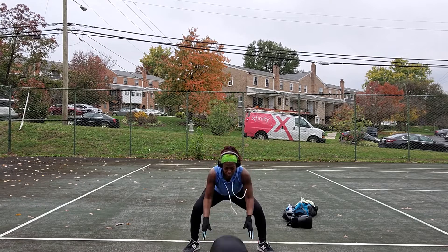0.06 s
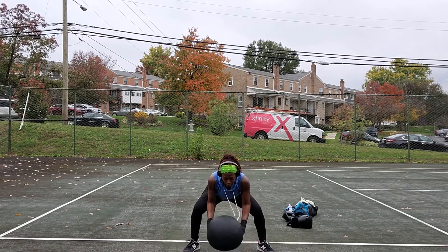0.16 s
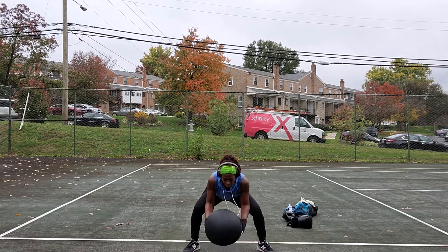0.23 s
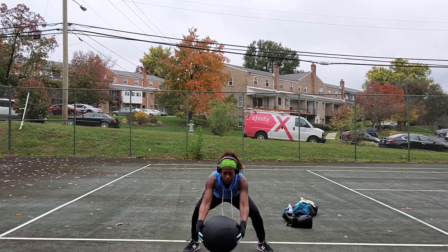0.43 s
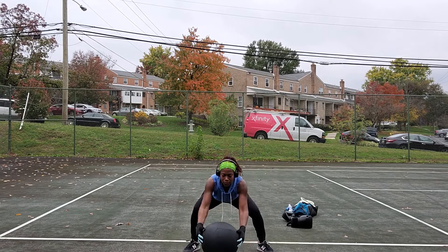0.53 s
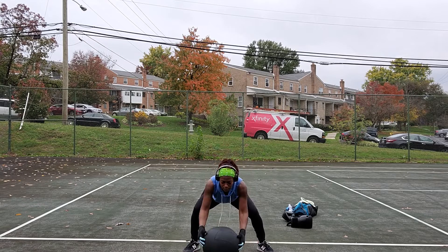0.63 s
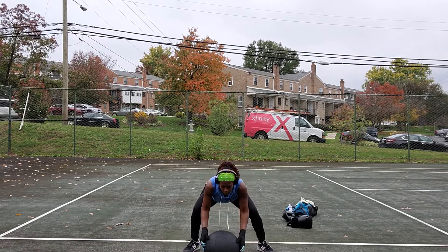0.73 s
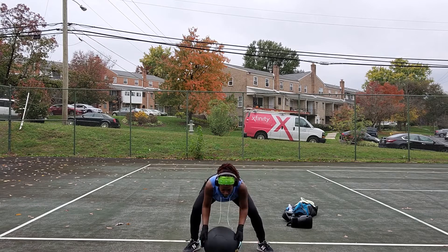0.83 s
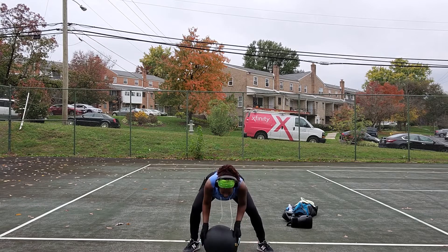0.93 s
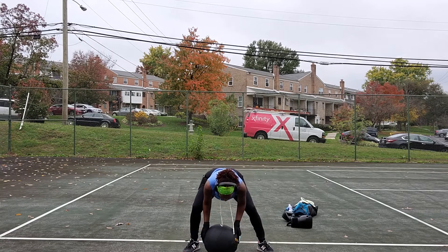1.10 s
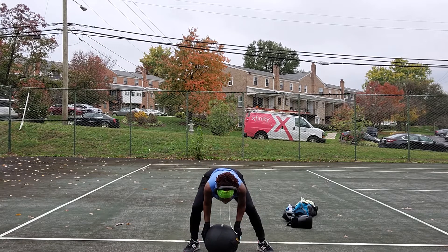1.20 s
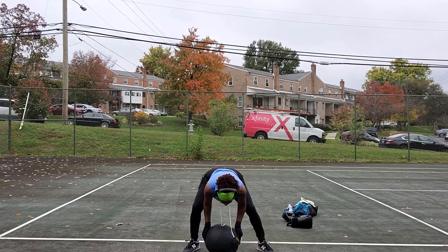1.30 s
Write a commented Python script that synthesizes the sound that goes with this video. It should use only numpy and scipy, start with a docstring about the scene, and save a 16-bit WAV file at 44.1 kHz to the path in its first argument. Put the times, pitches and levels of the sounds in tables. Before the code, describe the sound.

One sharp thump of a heavy exercise ball on hard ground, then a faint second landing.

```python
"""A heavy, soft exercise ball is slammed on an outdoor hard court: the impact makes its cover slap
and ring, its squashed body thump and its loose filling hiss. Gloves catch it softly on a low rebound,
and it drops once more with a light smack. The houses around return faint, scattered echoes.
Behind it are the broadband noise of distant traffic, swelling in a little wind, and the
narrow-band chirps of insects in the grass."""
import sys
import numpy as np
from scipy import signal
from scipy.fft import rfft, irfft, next_fast_len
from scipy.io import wavfile
from scipy.ndimage import map_coordinates

SR = 44100
rng = np.random.default_rng(int(sys.argv[2]) if len(sys.argv) > 2 else 0)


def store_wav(level_fs):
    """Save 16-bit WAV to argv[1]."""
    pcm = np.round(np.clip(np.atleast_2d(level_fs), -1, 1) * 32767)
    wavfile.write(sys.argv[1], SR, pcm.T.astype(np.int16))


N = 59535
T = np.arange(N) / SR
N_FFT = next_fast_len(2 * N)
HZ = np.fft.rfftfreq(N_FFT, 1 / SR)
SLAM_S, CATCH_S = .2274, .5935


# the cover meets the ground, patch after patch (time [s], relative level [dB], cutoff [Hz])
SLAPS = [(0.22745, 9.5, 4200), (0.2280, 1, 5500), (0.22945, 6.5, 4600), (0.22967, 5, 5200),
         (0.2341, 1.5, 2400)]
# spectra of slap and crackle (frequency [Hz], relative level [dB])
SLAP_SPECTRUM = [(60, -6), (300, 2), (1500, 1), (2300, -1), (3000, -8), (4000, -4), (5500, -3), (8000, -5),
                 (9500, -13), (15000, -9)]
CRACKLE_SPECTRUM = [(200, -15), (900, -4), (2200, 1), (3000, -7), (5500, -4), (8000, -8), (9500, -8),
                    (15000, 3)]
def cover_slap():
    """Impact radiation: each patch that lands sends out a pressure pulse, amid a brief crackle."""
    slaps = 0
    for start, db, cutoff_hz in SLAPS:
        pulse = minimum_phase(amp(along(SLAP_SPECTRUM)) / np.hypot(1, HZ / cutoff_hz))
        delay = np.exp(-2j * np.pi * HZ * start)
        slaps -= amp(db + 6) * irfft(pulse * delay, N_FFT)[:N]
    return slaps + amp(-17.5) * noise(CRACKLE_SPECTRUM) * burst(SLAM_S, rise=.0025, t60=.024)


# modes of the cover and its first push on the air (frequency [Hz], level [dB], T60 [s])
COVER_MODES = [(484, -9, .031), (935, -9, .017), (1505, -11.5, .017), (1820, -14, .02), (2270, -24, .025),
               (2446, -24, .02), (2760, -25.5, .03), (3660, -28.5, .04), (4260, -33, .035),
               (4970, -35, .04), (5560, -32, .045), (6480, -33, .03), (7900, -34, .035)]
PUSH_MODES = [(190, -15, .037), (290, -24, .045), (380, -23, .03)]
def cover_ring():
    """Damped free vibration: the cover pushes the air, then rings once it lies flat."""
    return ring(SLAM_S, PUSH_MODES, rise=.002) + ring(SLAM_S + .0013, COVER_MODES, rise=.0007)


def body_thump():
    """Volume displacement: the squashed body radiates one deep pressure pulse."""
    thump_hz, peak_s, rise_s, fall_s = 51, .023, .018, .012
    t = T - SLAM_S - peak_s
    swell = np.exp(-(t / np.where(t < 0, rise_s, fall_s)) ** 2 / 2)
    onset = np.clip((T - SLAM_S) / .003, 0, 1)
    return amp(-12.5) * swell * onset * np.cos(2 * np.pi * thump_hz * t)


# contacts of the second landing (time [s], level [dB])
SMACKS = [(0.8578, -36), (0.8604, -36), (0.8622, -38.5), (0.8665, -44)]
# their spectrum (frequency [Hz], relative level [dB])
SMACK_SPECTRUM = [(100, 6), (700, 1), (1100, -4), (2100, 1), (2700, -8), (3600, -4), (4400, -9), (6300, -5),
                  (8500, -9), (9500, -23), (15000, -25)]
# the modes they excite (frequency [Hz], level [dB], T60 [s])
SMACK_MODES = [(245, -44, .06), (685, -35, .038), (1340, -42, .03), (1975, -45, .025), (3213, -48, .035),
               (3518, -46, .035), (6160, -48, .03)]
def light_landing():
    """Impulsive excitation: a drop from a small height gives quick smacks and a short ring."""
    contacts = sum(amp(db) * burst(start, rise=.0002, t60=.016) for start, db in SMACKS)
    return contacts * noise(SMACK_SPECTRUM) + ring(SMACKS[1][0], SMACK_MODES, rise=.0015)


# spectra of the moving filling (frequency [Hz], relative level [dB])
HISS_SPECTRUM = [(100, -1), (300, 1), (500, -2), (1000, -5), (1500, -6), (2800, -8), (3800, -4), (5500, -4),
                 (7800, -9), (9500, -17), (15000, -16)]
SLUMP_SPECTRUM = [(200, -3), (450, 2), (1000, 0), (1600, -5), (3000, -18), (12000, -40)]
def filling():
    """Friction: loose filling hisses on the cover at each landing and slumps on the first rebound."""
    hard = amp(-28.5) * burst(SLAM_S + .003, rise=.011, t60=.092)
    light = amp(-52) * burst(SMACKS[0][0], rise=.006, t60=.14)
    hiss = diffuse(HISS_SPECTRUM) * (hard + light)
    slump = amp(-37) * noise(SLUMP_SPECTRUM) * burst(.253, rise=.003, t60=.035)
    return hiss + slump


# gloves and clothes brush the ball (time [s], level [dB], rise [s], T60 [s])
BRUSHES = [(.12, -67, .09, .2), (.578, -61, .001, .03), (.588, -58, .004, .09), (.615, -62.5, .035, .25),
           (.712, -65, .02, .4), (.87, -66, .03, .25), (.955, -62.5, .05, .2), (1.019, -61, .002, .04)]
# spectra of brushing and of the gloves' pat (frequency [Hz], relative level [dB])
BRUSH_SPECTRUM = [(200, 6), (1000, 6), (2000, 2), (3000, -5), (3700, -3), (4300, -7), (5600, -1),
                  (7700, -4), (9500, -15), (15000, -13)]
PAT_SPECTRUM = [(100, 2), (350, 0), (900, -5), (1600, -10), (3000, -22), (12000, -45)]
def handling():
    """Soft contact excites only low modes in the catch; sliding cloth adds friction noise."""
    catch = ring(CATCH_S, [(86, -33, .2), (195, -39, .08)], rise=.003)
    pat = amp(-46) * noise(PAT_SPECTRUM) * burst(CATCH_S - .005, rise=.006, t60=.05)
    strokes = sum(amp(db) * burst(start, rise, t60) for start, db, rise, t60 in BRUSHES)
    return catch + pat + strokes * noise(BRUSH_SPECTRUM)


# spectrum of the reflections (frequency [Hz], relative level [dB])
ECHO_SPECTRUM = [(60, 0), (170, 2), (300, 6), (490, -12), (750, 0), (950, -4), (1200, 2), (1500, -8),
                 (2150, 2), (3200, -2), (6000, -3), (14000, -5)]
# their decay (frequency [Hz], T60 [s])
ECHO_T60 = [(100, .5), (1000, .65), (2200, .62), (5000, .5), (12000, .33)]
def echoes(source):
    """Scattering: fence, trees and houses return a diffuse tail whose treble dies first."""
    hz, t, bands = signal.stft(diffuse(ECHO_SPECTRUM), SR, nperseg=256)
    decay = amp(-60 * t / along(ECHO_T60, hz)[:, None])
    tail = signal.istft(bands * decay, SR, nperseg=256)[1][:, :N]
    tail *= np.minimum(T / .02, 1)
    return signal.fftconvolve(source[None], tail / np.linalg.norm(tail[0]), axes=1)[:, :N]


# spectra of distant traffic (frequency [Hz], relative level [dB])
HUM_SPECTRUM = [(100, -4), (200, -4), (400, -11), (800, -11), (1200, -18.5), (2000, -23.5), (3000, -35),
                (4300, -35), (5200, -29), (6500, -38), (9000, -53), (15000, -57)]
RUMBLE_SPECTRUM = [(15, -10), (28, -1), (45, -6), (62, 0), (85, 0), (115, -7), (170, -18), (400, -45),
                   (3000, -110)]
def traffic():
    """Amplitude modulation: the breeze makes the far hum and rumble swell a little."""
    gust_db, gusts_per_s = .65, 6
    knots_db = gust_db * rng.standard_normal((2, int(N * gusts_per_s / SR) + 4))
    hum_swell, rumble_swell = [amp(map_coordinates(row, [T * gusts_per_s])) for row in knots_db]
    hum = amp(-51.8) * hum_swell * diffuse(HUM_SPECTRUM)
    rumble = amp(-43.8) * rumble_swell * diffuse(RUMBLE_SPECTRUM)
    return hum + rumble


# insect calls (time [s], frequency [Hz], level [dB])
CHIRPS = [(.005, 5900, -72), (.057, 6000, -71), (.11, 5950, -71), (.11, 4920, -69), (.165, 6000, -72),
          (.39, 5980, -69), (.47, 4920, -67), (.705, 4900, -67), (.828, 4920, -67), (.948, 4930, -69),
          (1.07, 4920, -68), (1.19, 4900, -69), (1.305, 4930, -69)]
def insects():
    """Resonance: each chirp is a short swell of noise confined to a narrow band."""
    sigma_s, half_width_hz = .016, 100
    chirps = np.zeros((2, N))
    for peak_s, hz, db in CHIRPS:
        resonance = 1 / (1 + ((HZ - hz) / half_width_hz) ** 2)
        tone = unit_rms(filtered(rng.standard_normal((2, N)), resonance))
        chirps += amp(db) * tone * np.exp(-((T - peak_s) / sigma_s) ** 2 / 2)
    return chirps


# likeness of left and right (frequency [Hz], correlation [-1 to 1])
COHERENCE = [(60, .96), (130, .96), (290, .75), (640, .3), (1400, -.2), (3100, .1), (12000, -.1)]
def diffuse(spectrum):
    """Diffuse field: noise from all around is alike on both sides at long wavelengths."""
    angle = np.arccos(np.clip(along(COHERENCE), -1, 1)) / 2
    gains = amp(along(spectrum)) * [np.cos(angle), np.sin(angle)]
    mid, side = filtered(rng.standard_normal((2, N)), gains)
    return unit_rms(np.array([mid + side, mid - side]))


def noise(spectrum):
    """Spectral shaping: coloured mono noise of rms 1."""
    return unit_rms(filtered(rng.standard_normal(N), amp(along(spectrum))))


def ring(start, modes, rise):
    """Modal superposition: damped sinusoids struck together."""
    phase = 2 * np.pi * (T - start)
    return -sum(amp(db) * burst(start, rise, t60) * np.sin(hz * phase) for hz, db, t60 in modes)


def burst(start, rise, t60):
    """Exponential decay after a linear rise; times in seconds."""
    t = np.maximum(T - start, 0)
    return np.minimum(t / rise, 1) * amp(-60 * np.maximum(t - rise, 0) / t60)


def minimum_phase(gain):
    """Causality: folding the cepstrum gives the minimum-phase response with this gain."""
    cepstrum = irfft(np.log(np.maximum(gain, 1e-6)), N_FFT)
    cepstrum[1:N_FFT // 2] *= 2
    cepstrum[N_FFT // 2 + 1:] = 0
    return np.exp(rfft(cepstrum))


def filtered(x, response):
    """Linear filtering: the spectrum of x times a frequency response."""
    return irfft(rfft(x, N_FFT) * response, N_FFT)[..., :N]


def along(points, hz=HZ):
    """Interpolation of (frequency [Hz], value) points on a log axis."""
    frequencies, values = np.transpose(points)
    return np.interp(np.log(hz + 1), np.log(frequencies + 1), values)


def amp(db):
    """Decibels to amplitude ratio."""
    return 10 ** (np.asarray(db) / 20)


def unit_rms(x):
    """Normalisation to rms 1."""
    return x / np.sqrt(np.mean(x ** 2) + 1e-20)


# the ball's stereo balance (frequency [Hz], left minus right level [dB])
BALL_BALANCE = [(200, 0), (500, -1.5), (950, -1), (1500, 3), (2500, -1), (5000, 0), (9000, 1.2)]
def scene():
    """Superposition of direct sound, echoes and background; the ball reaches the left side first."""
    ball = cover_slap() + cover_ring() + body_thump() + light_landing() + handling()
    sides, left_lead_s = np.array([[1], [-1]]), 3.2e-5
    balance = amp(sides * along(BALL_BALANCE) / 2)
    lead = np.exp(1j * np.pi * HZ * left_lead_s * sides)
    direct = filtered(ball, balance * lead)
    return direct + filling() + amp(-27) * echoes(ball) + traffic() + insects()


def record(dry):
    """Soft saturation rounds peaks near full scale; a steep low-pass limits the bandwidth."""
    cutoff_hz = 15900
    rounded = dry / (1 + np.abs(dry) ** 8) ** (1 / 8)
    return filtered(rounded, 1 / np.sqrt(1 + (HZ / cutoff_hz) ** 120))


dry = scene()
out = record(dry)
store_wav(out)
```